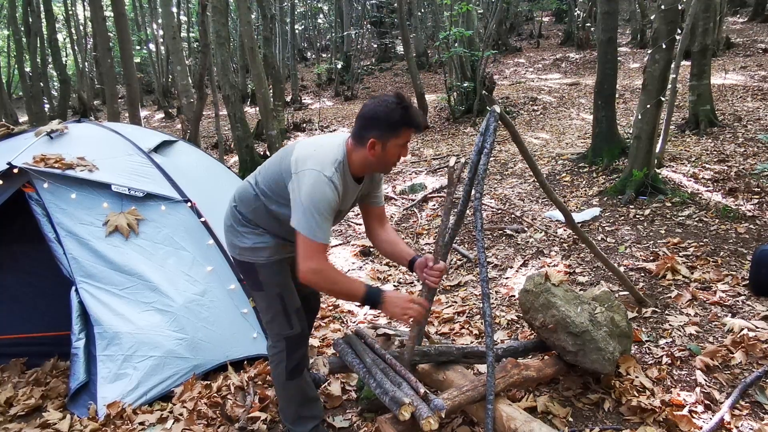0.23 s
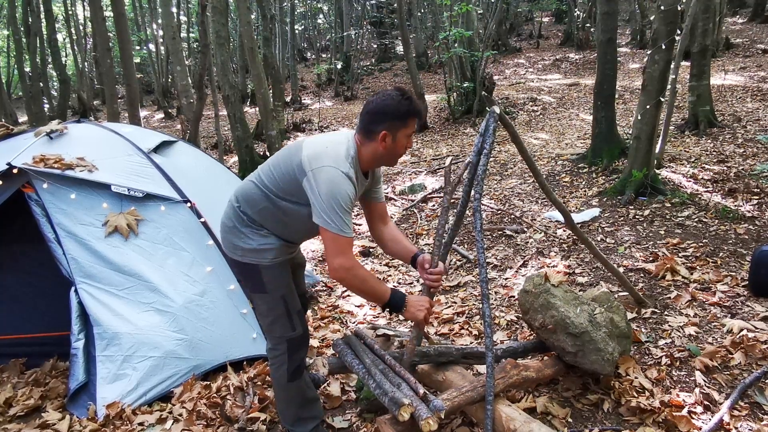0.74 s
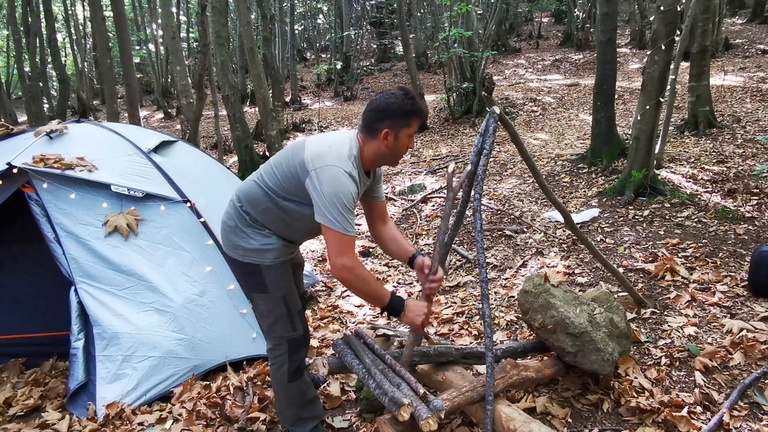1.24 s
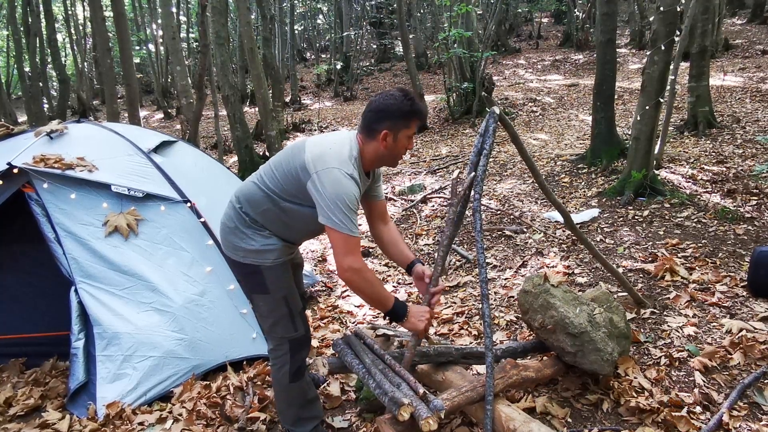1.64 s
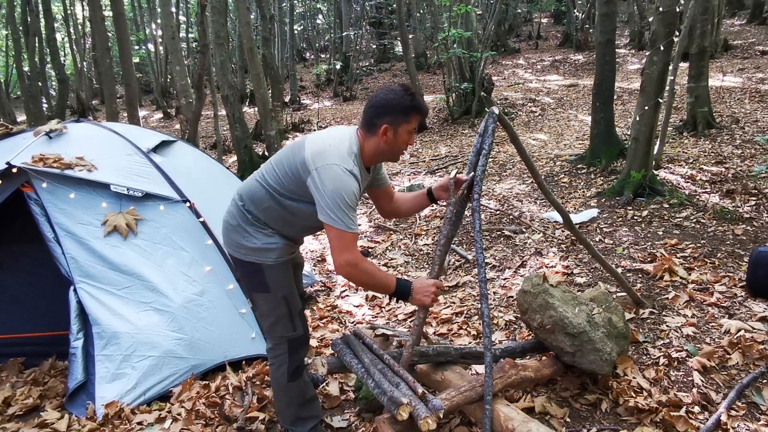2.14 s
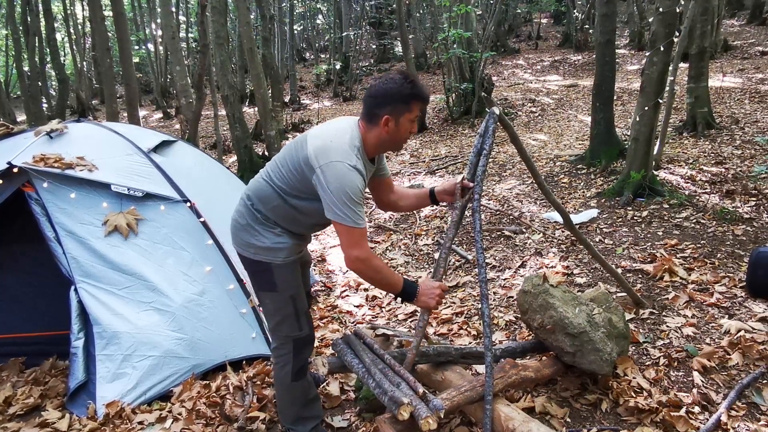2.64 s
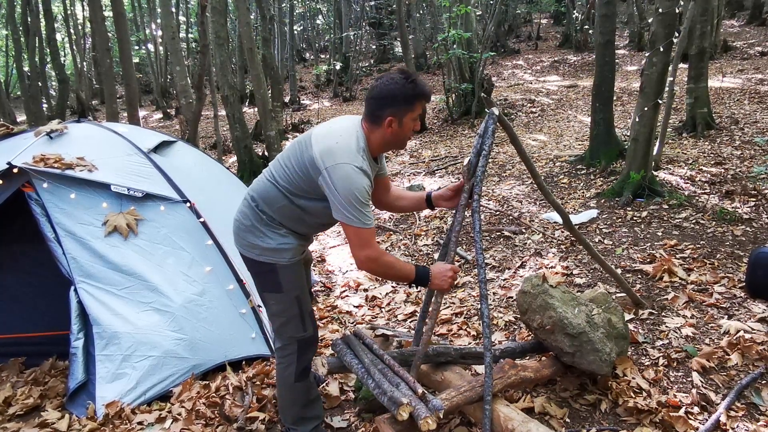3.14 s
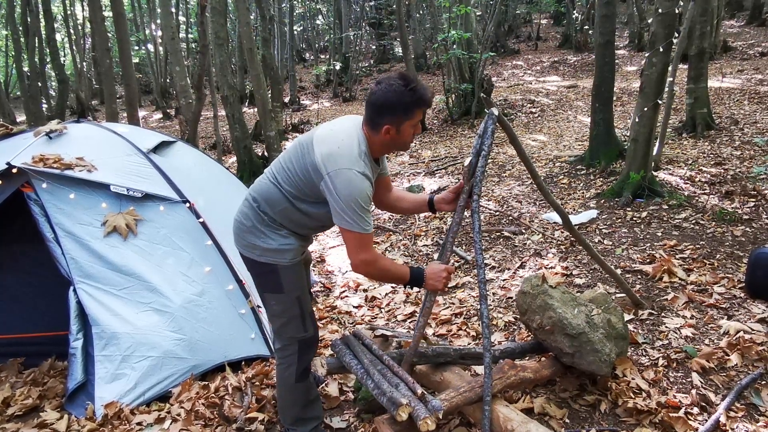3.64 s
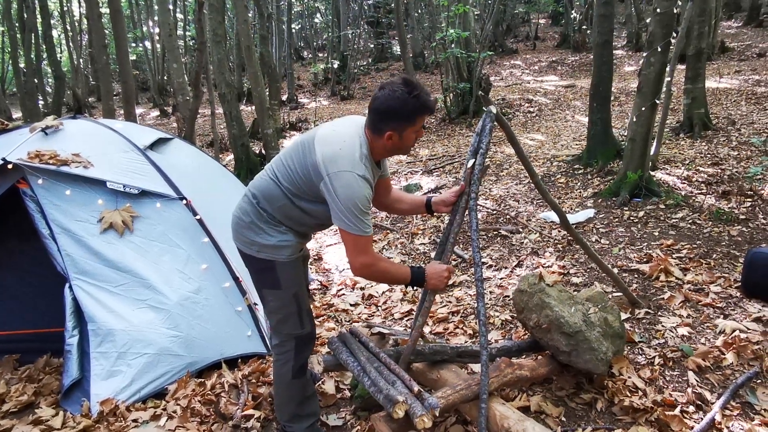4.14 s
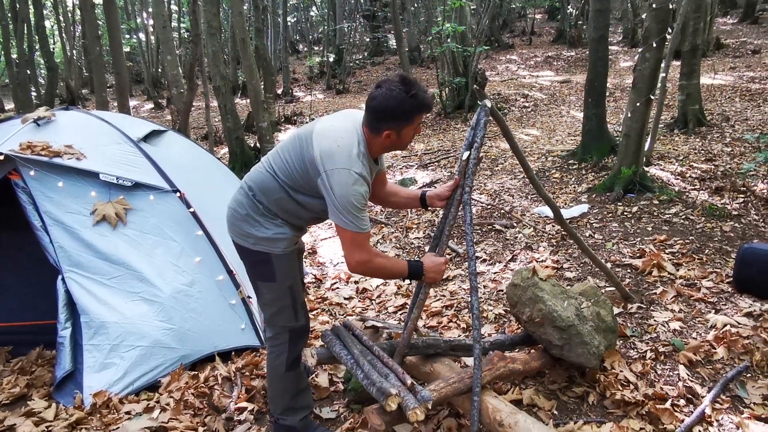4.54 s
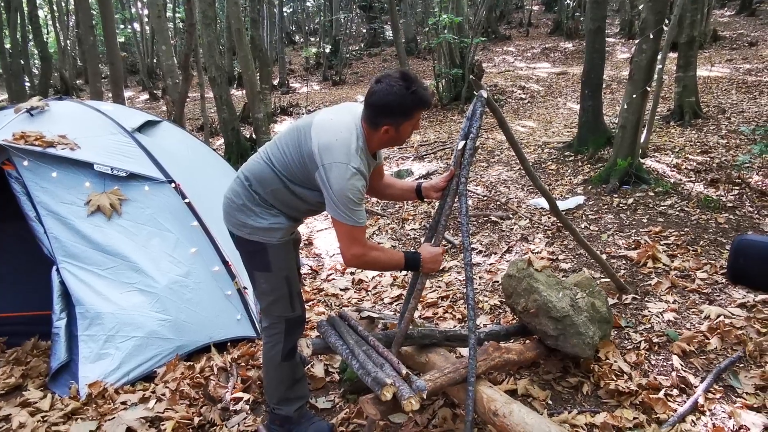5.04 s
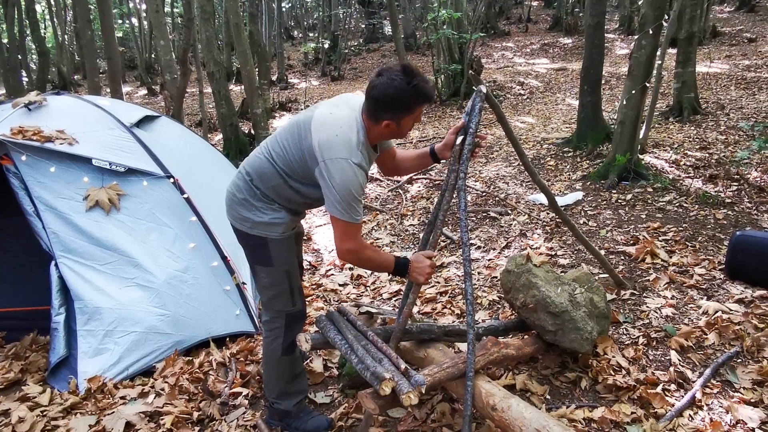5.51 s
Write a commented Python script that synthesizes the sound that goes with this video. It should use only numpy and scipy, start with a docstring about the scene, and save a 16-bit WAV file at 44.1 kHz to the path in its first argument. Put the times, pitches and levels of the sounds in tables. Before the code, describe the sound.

Wood clatters and dry leaves crunch in a quiet forest, followed by a dull knock, light bark snaps and hands sliding along a pole.

```python
"""Dry sticks are stacked on a forest floor. The quiet wood hums from the start, and trunks faintly echo.
First a bark flake snaps and a stick drops on the pile, each impact exciting damped modes of the wood.
Next dry leaves are shuffled, a mass of tiny fractures. At 1.3 s a pole is set down with a dull knock.
From then on it is eased against the others: hands hiss along it, bark slips and crackles, wood taps,
and the worker's movements thud softly."""
import sys
import numpy as np
from scipy import signal
from scipy.fft import rfft, irfft
from scipy.io import wavfile

SR = 44100
rng = np.random.default_rng(int(sys.argv[2]) if len(sys.argv) > 2 else 0)


def store_pcm(level_fs):
    """Save levels as 16-bit WAV."""
    pcm = np.round(np.clip(level_fs, -1, 1) * 32767).astype(np.int16)
    wavfile.write(sys.argv[1], SR, np.atleast_2d(pcm).T)


N = 254456
TIME = np.arange(N) / SR

# Levels in the tables are relative: the functions apply further gains.
# noise spectra (frequency [Hz], spectral level [dB])
RUMBLE_SPECTRUM = [(25, -3.5), (45, 2.5), (75, -8), (108, 2), (160, -10.5), (300, -38)]
HUM_SPECTRUM = [(70, -13), (150, -7), (235, 1), (350, -4), (500, -8.5), (800, -8.5), (1500, -24),
                (4000, -39.5)]
HISS_SPECTRUM = [(300, 0.5), (900, -3), (1600, -2), (2700, -1), (4000, -2), (6500, -1.5), (8000, -8),
                 (11000, -11), (16000, -18.5)]
SNAP_SPECTRUM = [(700, -19.5), (2500, -9.5), (5000, 0), (8000, -1), (11000, 2), (16000, -6)]
LEAF_SPECTRUM = [(150, -17), (500, -10), (1000, -3), (2600, 0), (3800, -4), (5200, 0.5), (7500, -6.5),
                 (9500, -2), (13000, -3), (16000, -12)]
SLIP_SPECTRUM = [(400, -47), (1000, -28), (2500, -6), (5500, 9), (7800, 3.5), (11000, 6.5), (16000, -9.5)]
HAND_SPECTRUM = [(500, -18), (2000, -16.5), (3500, -8.5), (5200, -2.5), (7500, -4.5), (9500, -1),
                 (12000, -0.5), (16000, -8)]
# left-right likeness of diffuse sound (frequency [Hz], correlation [0-1])
CORRELATION = [(40, 0.62), (130, 0.93), (300, 0.87), (640, 0.55), (1400, 0), (3000, 0.08), (16000, 0)]
# soft low sounds of the dropped wood and the worker moving (centre time [s], level [dB], half-length [s])
DEEP_THUDS = [(.95, -72, .07), (1.3, -60, .04), (3.36, -63, 0.05), (4.72, -60.5, 0.053), (5.26, -64, 0.03)]
MUFFLED_MOVEMENTS = [(.27, -57, 0.047), (1.1, -76, 0.58), (3.04, -64, 0.084)]
# the loudest bark flakes and leaf stalks snapping (time [s], level [dB], flake frequency [Hz])
SNAPS = [(.054, -39, 4650), (.093, -18.5, 10800), (0.139, -13.5, 10700), (0.1597, -16.5, 9000),
         (0.2008, -19.5, 9000), (0.2371, -19, 9000), (.5896, -33, 6440), (0.6756, -28.5, 4600),
         (.7331, -30.5, 13000), (0.881, -39, 13100), (.904, -36.5, 12300), (1.4354, -35.5, 4900),
         (2.444, -38.5, 11600), (2.4752, -31, 14000), (2.498, -21.5, 13200), (2.651, -39, 15000),
         (2.675, -27, 12060), (2.6842, -15.5, 10900), (2.6914, -17.5, 10350), (2.7285, -28.5, 11170),
         (3.03, -20.5, 8300), (3.1538, -36, 10540), (3.7264, -27.5, 10100), (3.7462, -27, 11700),
         (3.785, -33, 4700), (3.8, -32.5, 14100), (3.929, -29, 14200), (3.9744, -18.5, 7040),
         (4.496, -30.5, 12800), (4.5717, -40, 6840), (4.8258, -34.5, 12300), (4.9784, -34.5, 12200),
         (4.986, -37, 14500), (5.086, -35, 13900), (5.213, -37, 8500), (5.3809, -40, 6400),
         (5.389, -32, 11500), (5.703, -35.5, 14900), (5.72, -36, 14700)]
# normal modes of each named piece of wood (frequency [Hz], level [dB], t60 [s])
WOOD_MODES = { "log": [(367, -47, 0.087), (568, -22.5, 0.082), (718, -25, 0.054), (926, -25.5, 0.29),
              (1077, -22, .06), (1324, -19.5, 0.055), (1477, -19, 0.093), (1627, -33, 0.0294),
              (1800, -21.5, 0.035), (2050, -27, 0.028), (2125, -28, 0.022), (2410, -38, 0.023)],
              "branch": [(314, -35.5, 0.18), (492, -27.5, 0.174), (675, -31, 0.082), (819, -24, 0.12),
              (933, -15, 0.16), (1272, -20.5, 0.07), (1737, -27.5, 0.044), (2005, -19, 0.029),
              (2830, -22.5, 0.034), (2900, -38, 0.0124), (3060, -29, 0.03)], "stick": [(384, -35.5, 0.16),
              (792, -26.5, 0.16), (1015, -23.5, 0.1), (1160, -26.5, 0.043), (1570, -25.5, 0.058),
              (2350, -40.5, 0.074), (2490, -32.5, 0.044)], "pole": [(564, -34.5, 0.014), (732, -40, 0.068),
              (890, -37, 0.027), (1085, -37, 0.043), (1293, -36.5, 0.036), (1994, -47.5, 0.052),
              (2164, -48.5, 0.083)], "pile": [(107, -56, .12), (183.5, -46, 0.052), (243, -47, 0.094),
              (331, -45, 0.075), (409, -42.5, 0.1), (534, -44, 0.022)], "rod": [(920, -60, 0.033),
              (1200, -56, 0.02), (1606, -72, 0.029), (1940, -64, 0.039), (2770, -62, 0.047)],
              "splinter": [(1290, -45, 0.0096), (1840, -44, 0.0054), (2350, -45.5, 0.0087)],
              "twig": [(1106, -58, 0.035), (1530, -66, 0.047), (2190, -46.5, 0.029), (2270, -52, 0.027)], }
# wood dropped or set on wood (time [s], level [dB], contact cutoff [Hz], piece [name])
IMPACTS = [(.0828, -3, 2960, "log"), (.0853, 0.5, 5900, "log"), (.087, -3, 302, "pile"),
           (.0932, -2, 1700, "log"), (.1028, -3.5, 6000, "branch"), (.1097, -6, 2984, "branch"),
           (.129, -2.5, 1090, "stick"), (.139, -8, 1400, "branch"), (0.161, -2.5, 6000, "stick"),
           (0.2719, -0.5, 1200, "pole"), (.273, -7, 2020, "pile"), (0.3335, 14, 6000, "splinter"),
           (.405, 16, 3520, "splinter"), (1.2977, 2.5, 5000, "pole"), (1.3, -11, 2000, "pile"),
           (1.3045, -6, 4900, "pole"), (1.3116, 5, 1500, "pile"), (1.344, 0, 600, "pile"),
           (1.481, 4.5, 6000, "twig"), (1.526, -4, 6040, "twig"), (1.54, -3, 6000, "twig"),
           (1.82, -8.5, 4000, "twig"), (2.496, -6, 5970, "rod"), (2.685, 0, 6000, "rod"),
           (2.761, -22, 4000, "pole"), (3.0317, -5, 6000, "rod"), (3.7307, 7.5, 2200, "rod")]
# leaf litter pushed aside, and hands sliding along the pole
# (time of full pressure [s], level [dB], attack [s], hold [s], release [s])
LEAF_SHUFFLES = [(.17, -43, 0.078, 0.06, 0.24), (.392, -31.5, 0.1, 0.0061, 0.081),
                 (.525, -35.5, 0.28, 0.013, 0.24), (.74, -46.5, 0.16, 0.0091, 0.049)]
HAND_STROKES = [(1.3, -59, 0.045, 0.0043, 0.034), (1.525, -51.5, 0.17, 0.02, 0.026),
                (2.012, -45, 0.0033, 0.017, 0.017), (2.145, -52.5, 0.069, .12, 0.026),
                (2.493, -50, .09, .005, 0.036), (2.69, -53.5, 0.018, 0.047, 0.039),
                (2.86, -56.5, .04, .005, 0.047), (2.968, -46, 0.065, 0.042, 0.091),
                (3.1, -49.5, .08, 0.069, 0.053), (3.731, -40, .013, .003, 0.058),
                (3.79, -55.5, .04, .01, 0.07), (3.932, -46.5, 0.016, .04, 0.033),
                (4.01, -59, .05, 0.19, 0.15), (4.59, -61, .04, .005, 0.036),
                (4.705, -57.5, 0.047, 0.0069, 0.043), (4.845, -51, 0.032, .005, 0.039),
                (4.935, -58.5, 0.011, 0.0065, 0.036), (5.41, -60, .05, 0.044, .02),
                (5.492, -47.5, 0.038, 0.014, 0.13), (5.69, -56, 0.03, 0.019, 0.044)]
# bark slipping on bark (centre time [s], level [dB], half-length [s], resonance at the contact [Hz])
SLIPS = [(1.101, -56, .008, 2220), (2.497, -39, 0.006, 2800), (2.689, -36.5, .0045, 2290),
         (3.033, -38, .002, 1950), (3.733, -36.5, 0.0054, 2040), (3.96, -36.5, 0.012, 2670),
         (3.979, -39, 0.0023, 2620), (4.122, -47, .0057, 2070), (4.344, -58, .008, 2200),
         (5.389, -42.5, 0.0036, 2500), (5.69, -50, .0028, 2500)]
# resonances of a rubbed stick and of the right microphone port (frequency [Hz], width [Hz], gain [dB])
STICK_RESONANCES = [(2014, 60, 11), (2830, 73, 4), (3700, 790, -2.5), (5700, 550, -1), (7200, 240, 3.5)]
PORT_RESONANCES = [(2350, 545, 8.5), (4520, 650, 2.5), (6740, 230, 7), (10930, 430, 8), (12410, 1760, 6.5),
                   (14990, 390, 11.5)]


def from_db(db):
    """Amplitude grows tenfold for every 20 dB."""
    return 10 ** (np.asarray(db) / 20)


def unit_rms(x):
    """Division by the root mean square gives unit power."""
    return x / np.sqrt(np.mean(x ** 2) + 1e-20)


def at_hz(points, hz):
    """A spectrum is interpolated on a logarithmic frequency axis."""
    frequencies, values = np.transpose(points)
    return np.interp(np.log(hz + 1), np.log(frequencies), values)


def diffuse_noise(spectrum):
    """A diffuse field is correlated between the ears only at long wavelengths."""
    hz = np.arange(N // 2 + 1) * SR / N
    mid, side = rfft(rng.standard_normal((2, N)))
    alike = at_hz(CORRELATION, hz)
    pair = np.sqrt(1 + alike) * mid + np.sqrt(1 - alike) * side * [[1], [-1]]
    return unit_rms(irfft(pair * from_db(at_hz(spectrum, hz)), N))


def decay(clicks, t60):
    """Exponential decay: each impulse falls by 60 dB in t60 seconds."""
    return signal.lfilter([1], [1, -from_db(-60 / (t60 * SR))], clicks + 1e-18)


def ring(clicks, hz, t60):
    """A damped oscillator answers each impulse with a decaying sine."""
    radius, angle = from_db(-60 / (t60 * SR)), 2 * np.pi * hz / SR
    return signal.lfilter([0, np.sin(angle)], [1, -2 * radius * np.cos(angle), radius ** 2], clicks + 1e-18)


def resonate(x, peaks):
    """Each resonance raises, or an antiresonance lowers, a band about its frequency."""
    for hz, width_hz, db in peaks:
        band = signal.lfilter(*signal.iirpeak(hz, hz / width_hz, fs=SR), x)
        x = x + (from_db(db) - 1) * band
    return x


def pulses(rows):
    """Gaussian envelopes add in amplitude."""
    return sum(from_db(db) * np.exp(-.5 * ((TIME - s) / half) ** 2) for s, db, half in rows)


def strokes(rows, range_db=20):
    """Incoherent strokes add in power; each moves by range_db per attack or release time."""
    power = 0
    for s, db, attack, hold, release in rows:
        away = np.maximum(s - TIME, 0) / attack + np.maximum(TIME - s - hold, 0) / release
        power = power + from_db(db - range_db * np.minimum(away, 10)) ** 2
    return np.sqrt(power)


def crinkle(spectrum, per_s, spread_db, grain_t60, clump_db, clumps_per_s=90):
    """Shot noise: countless tiny fractures of uneven size add in power and swell in clumps."""
    born = rng.random(N) < per_s / SR
    sizes = from_db(spread_db * np.minimum(rng.exponential(1, N), 4))
    power = decay(born * sizes ** 2, grain_t60 / 2)
    grains = diffuse_noise(spectrum) * np.sqrt(power)
    clumps = np.interp(TIME * clumps_per_s, np.arange(4096), rng.standard_normal(4096))
    return unit_rms(grains * from_db(clump_db * clumps))


def ambience_and_thuds(rumble_db, hum_db, hiss_db):
    """A steady diffuse field of forest noise, with low thuds from dropped wood and the worker moving."""
    rumble = (from_db(rumble_db) + pulses(DEEP_THUDS)) * diffuse_noise(RUMBLE_SPECTRUM)
    hum = (from_db(hum_db) + pulses(MUFFLED_MOVEMENTS)) * diffuse_noise(HUM_SPECTRUM)
    hiss = from_db(hiss_db) * diffuse_noise(HISS_SPECTRUM)
    return rumble * from_db([[3.8], [-3.8]]) + hum * from_db([[1.6], [-1.6]]) + hiss


def snap_events(stray_gap_s=.12, stray_db=-50.5, wait_s=.012, loss_db=19, flake_hz=(5900, 14900)):
    """Each loud fracture triggers a smaller one; faint strays arrive as a Poisson process."""
    strays = [(s, stray_db) for s in np.cumsum(stray_gap_s * rng.exponential(1, 80))]
    triggered = [(s + wait_s * rng.uniform(.5, 2.4), db - loss_db) for s, db, _ in SNAPS]
    return SNAPS + [(s, db + rng.standard_normal(), rng.uniform(*flake_hz)) for s, db in strays + triggered]


def bark_snaps(gain_db, snap_t60, shiver_db, shiver_t60, flake_db, flake_t60, tear_s):
    """Brittle fracture: a flake tears, ticks and rings briefly, and the bark around it shivers."""
    clicks, flakes = np.zeros(N), np.zeros((2, N))
    t = TIME[:SR // 20]
    for s, db, hz in snap_events():
        at = round(s * SR)
        tone = np.sin(2 * np.pi * (hz * t + rng.random((2, 1))))   # each ear hears its own phase
        if at < N:
            clicks[at] += from_db(db)
            flakes[:, at:at + len(t)] += (from_db(db - 60 * t / flake_t60) * tone)[:, :N - at]
    tearing = decay(clicks[::-1], tear_s)[::-1] / 2   # fibres give way just ahead of the break
    shiver = from_db(shiver_db) * decay(clicks, shiver_t60)
    ticks = diffuse_noise(SNAP_SPECTRUM) * (tearing + decay(clicks, snap_t60) + shiver)
    return from_db(gain_db) * ticks + from_db(flake_db) * flakes


def forest_echo(x, near_db, near_t60, far_db, far_t60):
    """Scattering: ground and tent return the sound at once, the trunks later and fainter."""
    t = TIME[:SR]
    near, far = rng.standard_normal((2, 2, SR))
    near = near * from_db(-60 * t / near_t60) * (t > .003)
    far = far * from_db(-60 * t / far_t60) * (t > .025)
    response = (from_db(near_db) * unit_rms(near) + from_db(far_db) * unit_rms(far)) / np.sqrt(SR)
    return signal.fftconvolve(x, response, axes=1)[:, :N]


def wood_knocks(gain_db, uneven_db, crack_db, crack_t60):
    """An impact excites normal modes and a noisy crack; a soft contact acts as a low-pass filter."""
    modes, energy = np.zeros(N), np.zeros(N)
    click = np.r_[1., np.zeros(SR // 2)]
    for s, impact_db, cutoff_hz, piece in IMPACTS:
        at = round(s * SR)
        for k, (hz, mode_db, t60) in enumerate(WOOD_MODES[piece]):
            gain = from_db(impact_db + mode_db + uneven_db * rng.standard_normal())
            gain /= np.hypot(1, (hz / cutoff_hz) ** 2)
            modes[at:at + len(click)] += ((-1) ** k * gain * ring(click, hz, t60))[:N - at]
            energy[at] += gain ** 2
    crack = from_db(crack_db) * np.sqrt(decay(energy, crack_t60 / 2)) * diffuse_noise(LEAF_SPECTRUM)
    pair = np.array([modes, np.roll(modes, 2)])   # the sound arrives a hair earlier on the left
    return from_db(gain_db) * (pair + crack)


def leaf_ticks(per_s, spread_db, t60_cycles, pitches=24):
    """Leaves flick against each other, each a damped oscillator with a frequency of its own."""
    ticks = np.zeros((2, N))
    for hz in np.geomspace(1500, 14000, pitches):
        born = np.flatnonzero(rng.random(N) < per_s / pitches / SR)
        sizes = from_db(spread_db * np.minimum(rng.exponential(1, len(born)), 3))
        clicks = np.zeros((2, N))
        clicks[:, born] = sizes * rng.choice([-1, 1], (2, len(born)))
        ticks += hz * from_db(at_hz(LEAF_SPECTRUM, hz)) * ring(clicks, hz, t60_cycles / hz)
    return unit_rms(ticks)


def leaf_shuffles(crush_db, tick_db):
    """Superposed fractures of crushed leaves merge into a full noise, with single ticks above it."""
    crush = crinkle(LEAF_SPECTRUM, per_s=3000, spread_db=2.0, grain_t60=0.03, clump_db=0.5)
    ticks = leaf_ticks(per_s=450, spread_db=6.0, t60_cycles=97)
    return strokes(LEAF_SHUFFLES) * (from_db(crush_db) * crush + from_db(tick_db) * ticks)


def bark_slips(gain_db, contact_width_hz, contact_db):
    """Source and filter: rough bark gives way in fine fractures, coloured by the stick's resonances."""
    fractures = crinkle(SLIP_SPECTRUM, per_s=2500, spread_db=3.6, grain_t60=.003, clump_db=1.2)
    rubbed = resonate(fractures, STICK_RESONANCES)
    slips = np.zeros((2, N))
    for s, db, half, hz in SLIPS:
        slip = pulses([(s, db, half)]) * rubbed + 1e-18
        slips += resonate(slip, [(hz, contact_width_hz, contact_db)])
    return from_db(gain_db) * slips


def hand_strokes(gain_db):
    """Sliding friction of hands on bark makes a high, fine hiss."""
    hiss = crinkle(HAND_SPECTRUM, per_s=4000, spread_db=1.5, grain_t60=0.0062, clump_db=3.0)
    return from_db(gain_db) * strokes(HAND_STROKES) * hiss


def scene():
    """Direct sound, echo and background superpose; a level difference sets the work a little to the right."""
    background = ambience_and_thuds(rumble_db=-65.5, hum_db=-66.5, hiss_db=-63.0)
    work = bark_snaps(gain_db=-14, snap_t60=0.0095, shiver_db=-11.0, shiver_t60=0.048,
                      flake_db=-8.5, flake_t60=0.008, tear_s=0.0085)
    work += wood_knocks(gain_db=-1.5, uneven_db=2.53, crack_db=-21.5, crack_t60=0.082)
    work += leaf_shuffles(crush_db=-2.5, tick_db=-10.5)
    work += bark_slips(gain_db=-3.5, contact_width_hz=110, contact_db=11.5)
    work += hand_strokes(gain_db=-1.0)
    echo = forest_echo(work, near_db=-11.5, near_t60=0.06, far_db=-18, far_t60=0.38)
    return (background + work + echo) * from_db([[-1.5], [1.5]])


def record(dry, cutoff_hz=16100):
    """The right microphone port resonates at a few frequencies; a steep low-pass cuts the top."""
    left, right = dry
    low_pass = signal.ellip(10, .1, 80, cutoff_hz, fs=SR, output="sos")
    return signal.sosfilt(low_pass, [left, resonate(right, PORT_RESONANCES)])


dry = scene()
out = record(dry)
store_pcm(out)
```